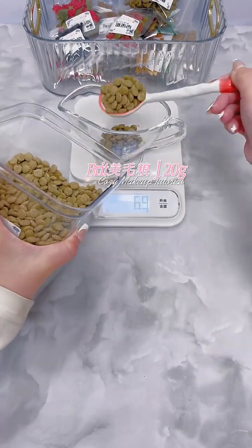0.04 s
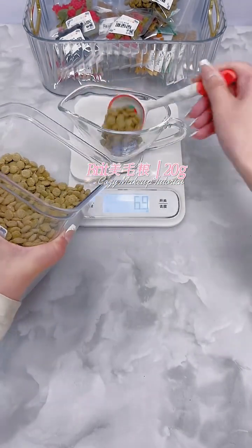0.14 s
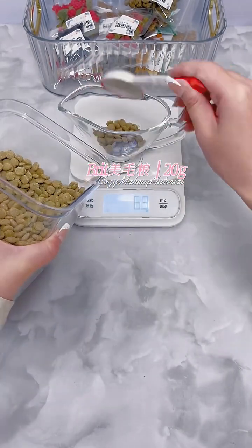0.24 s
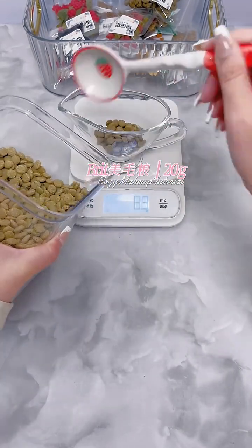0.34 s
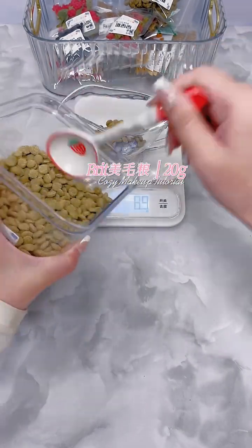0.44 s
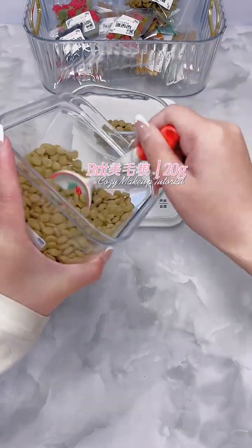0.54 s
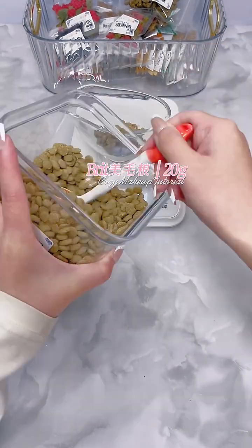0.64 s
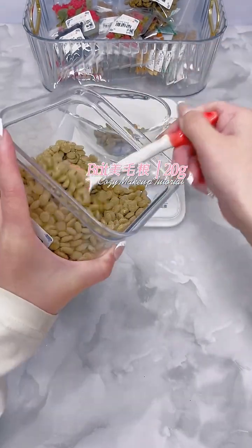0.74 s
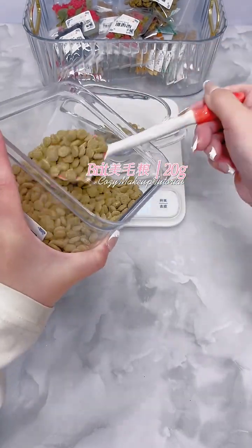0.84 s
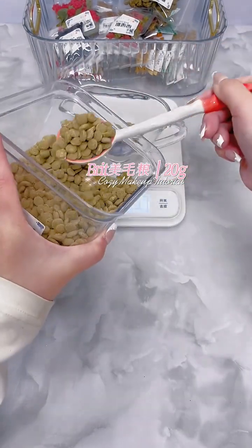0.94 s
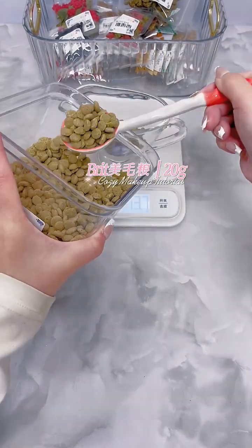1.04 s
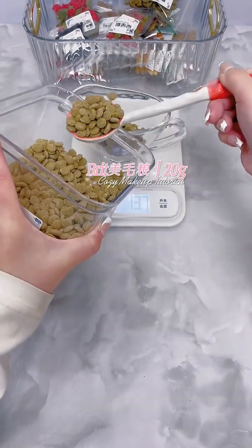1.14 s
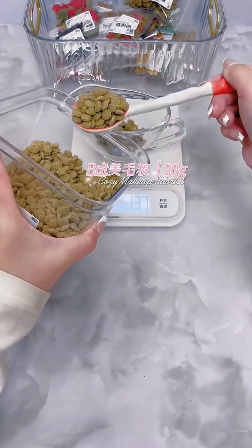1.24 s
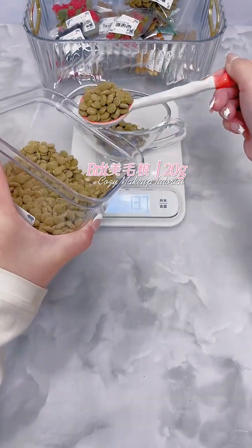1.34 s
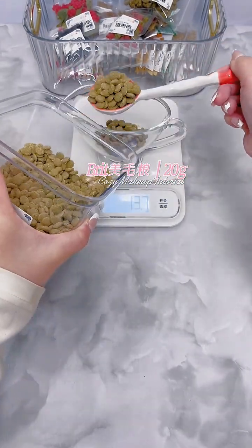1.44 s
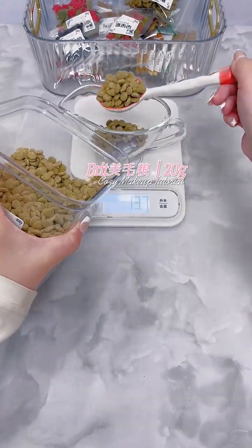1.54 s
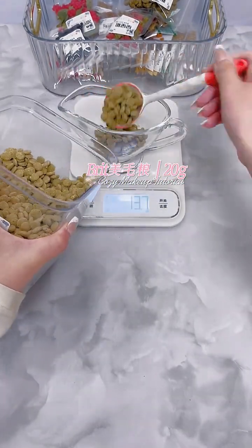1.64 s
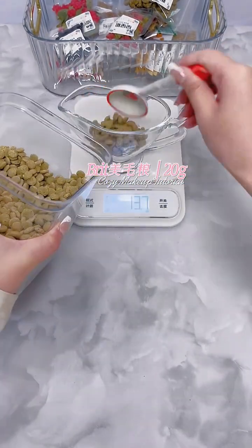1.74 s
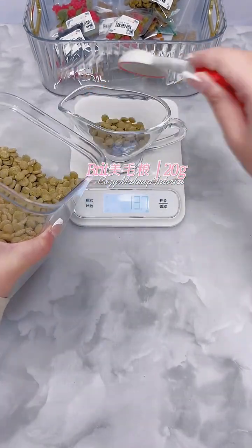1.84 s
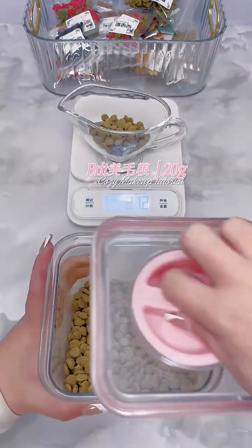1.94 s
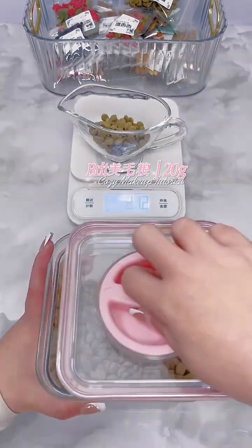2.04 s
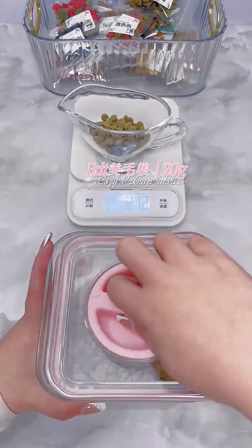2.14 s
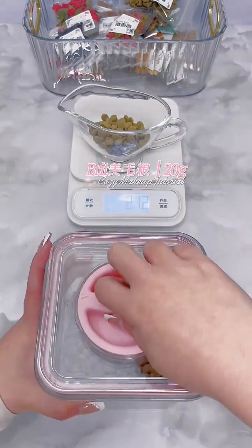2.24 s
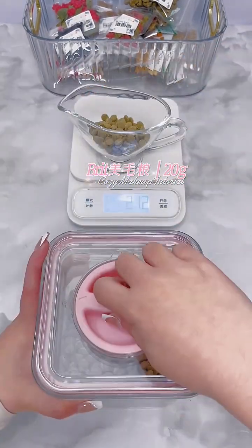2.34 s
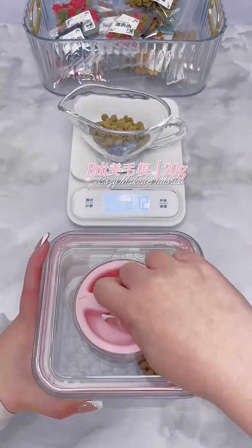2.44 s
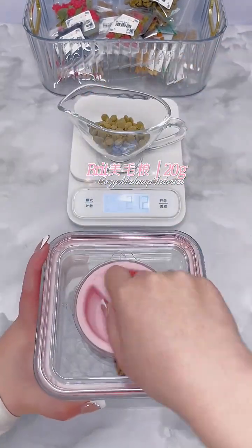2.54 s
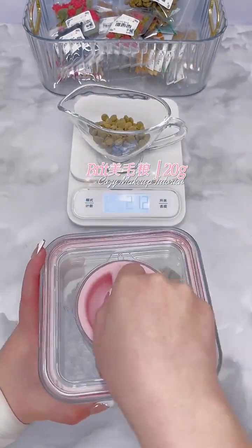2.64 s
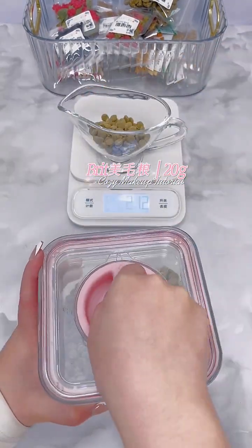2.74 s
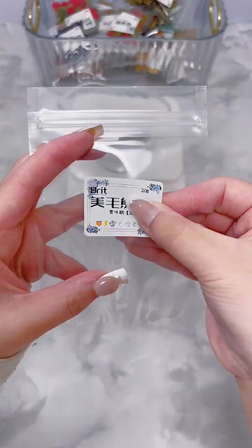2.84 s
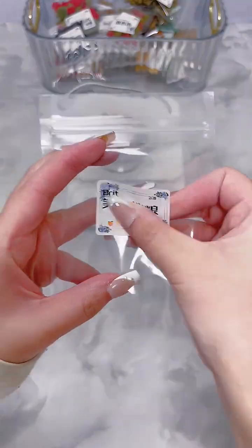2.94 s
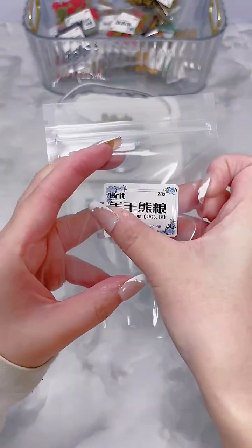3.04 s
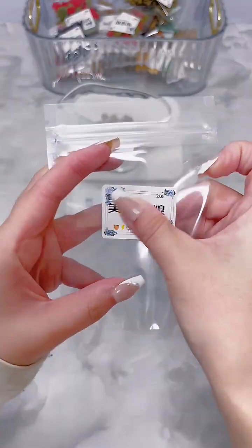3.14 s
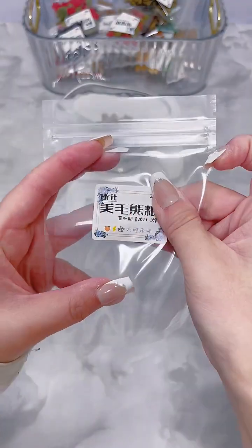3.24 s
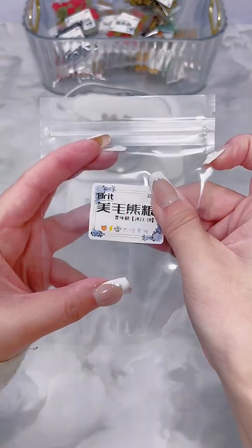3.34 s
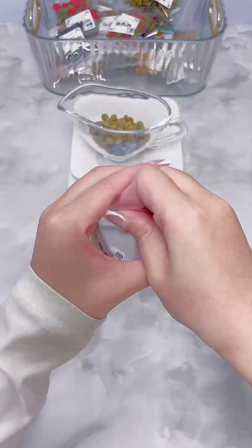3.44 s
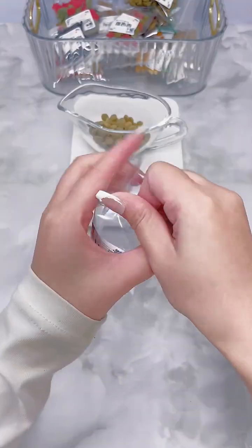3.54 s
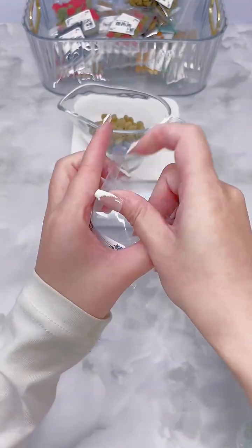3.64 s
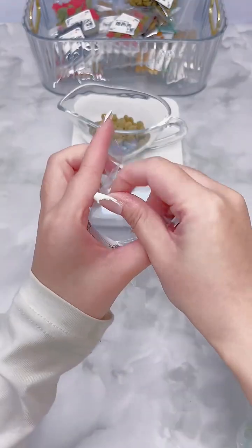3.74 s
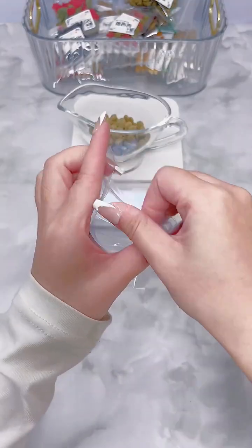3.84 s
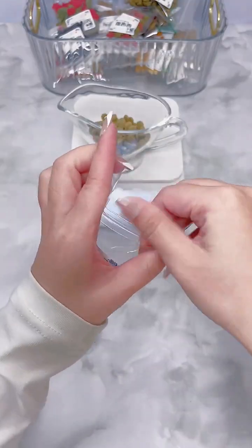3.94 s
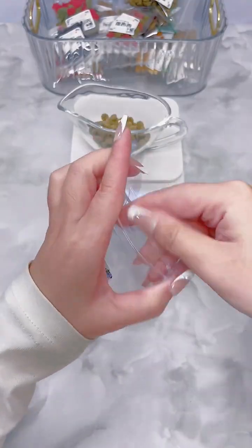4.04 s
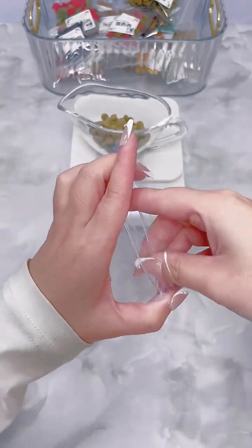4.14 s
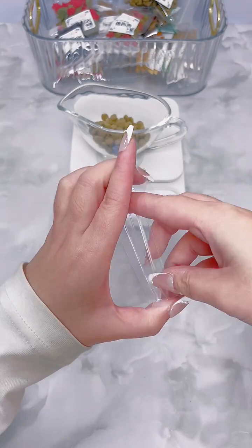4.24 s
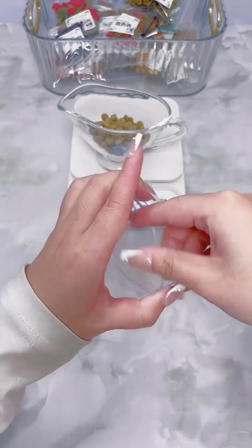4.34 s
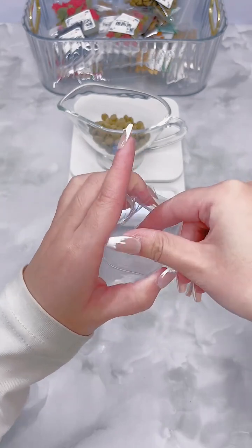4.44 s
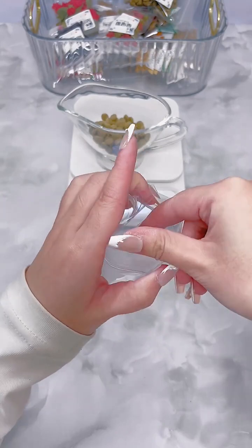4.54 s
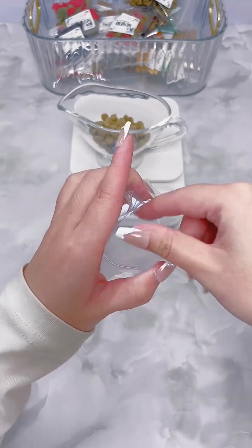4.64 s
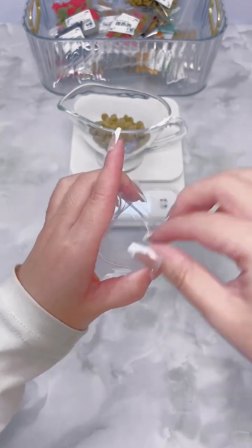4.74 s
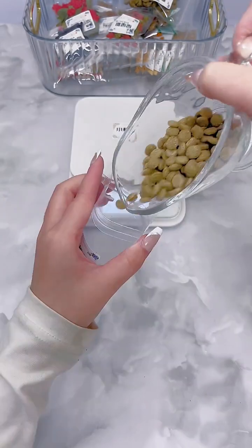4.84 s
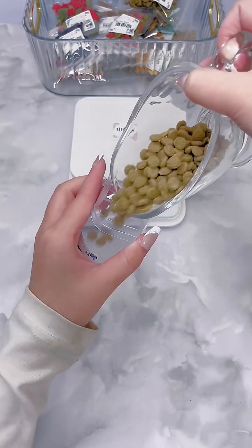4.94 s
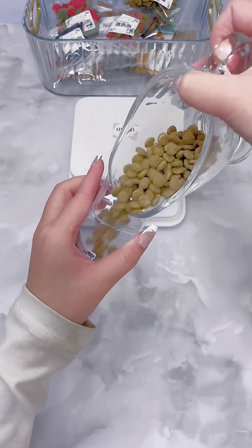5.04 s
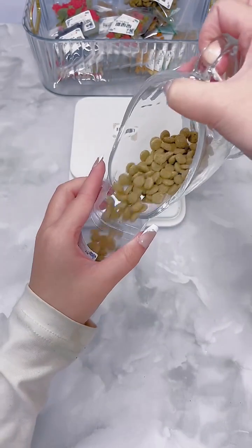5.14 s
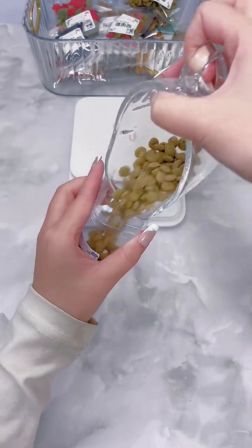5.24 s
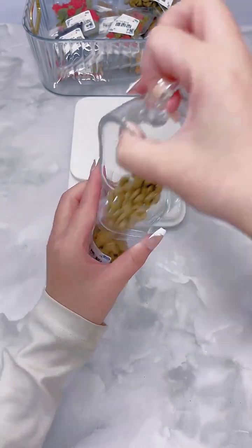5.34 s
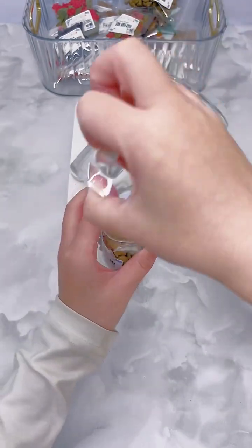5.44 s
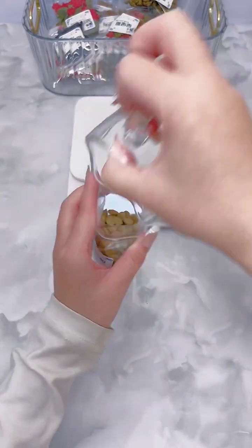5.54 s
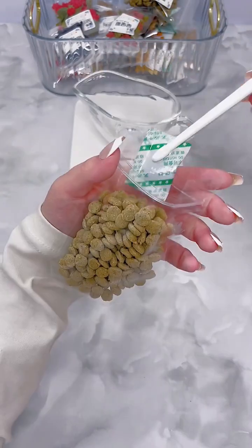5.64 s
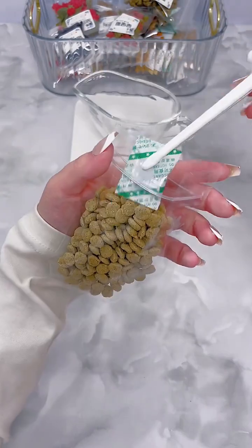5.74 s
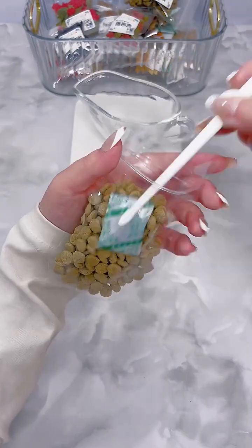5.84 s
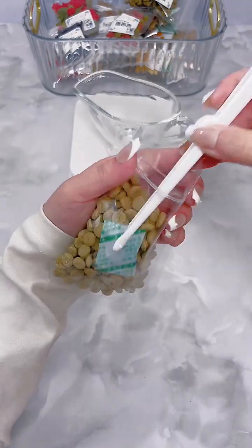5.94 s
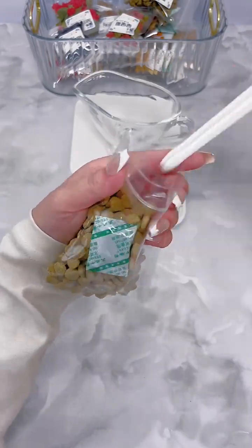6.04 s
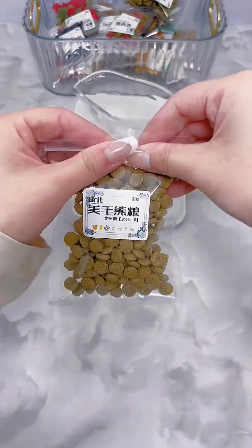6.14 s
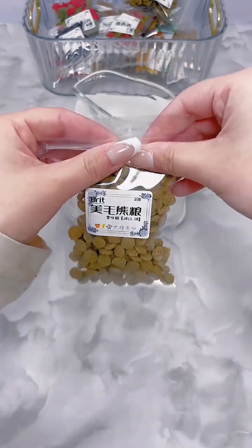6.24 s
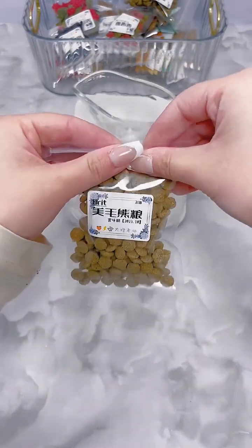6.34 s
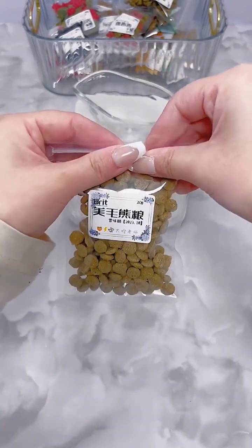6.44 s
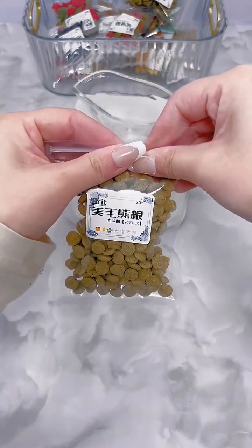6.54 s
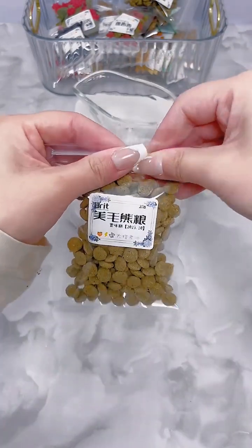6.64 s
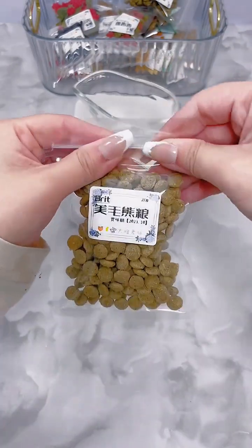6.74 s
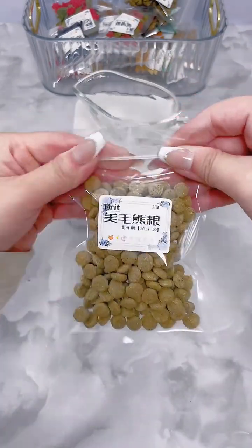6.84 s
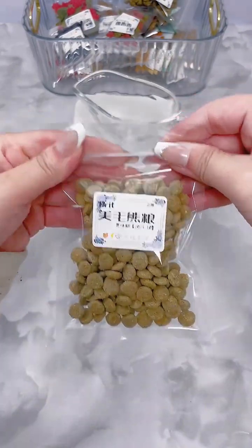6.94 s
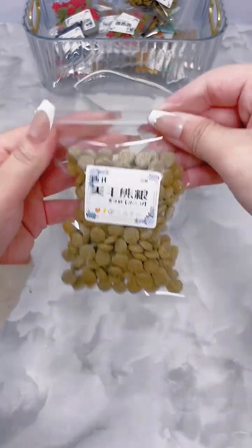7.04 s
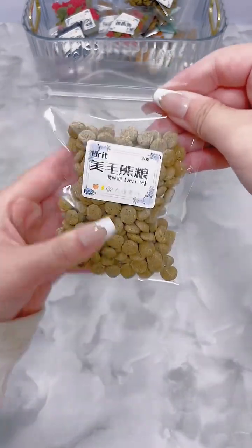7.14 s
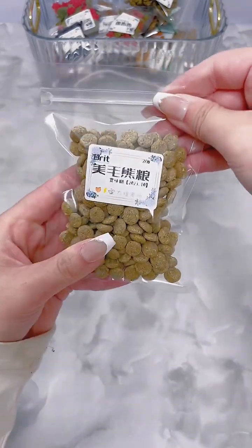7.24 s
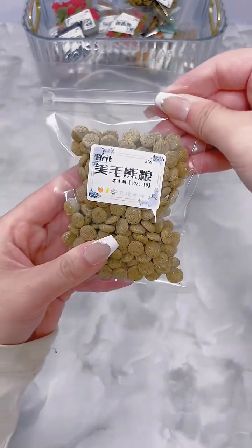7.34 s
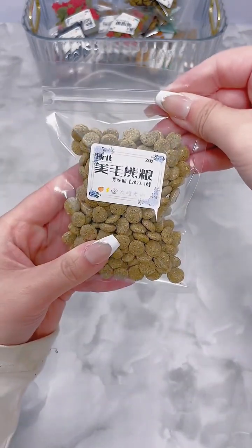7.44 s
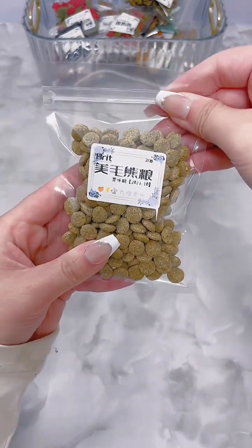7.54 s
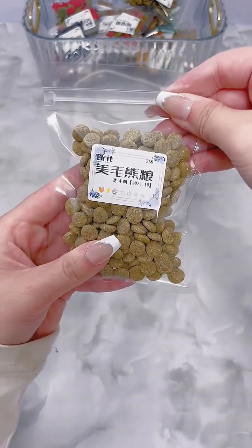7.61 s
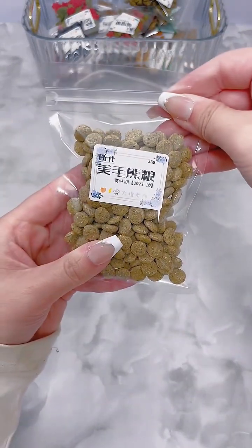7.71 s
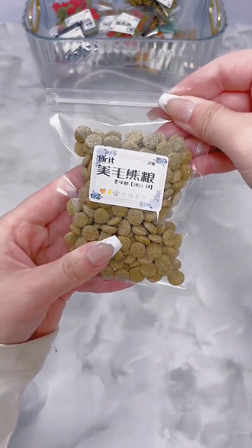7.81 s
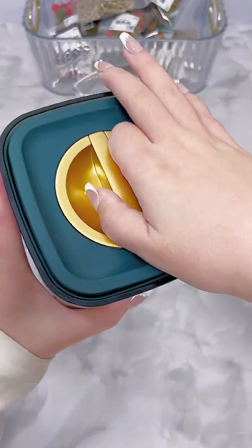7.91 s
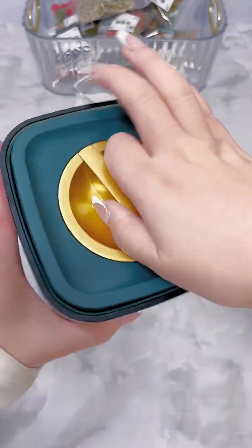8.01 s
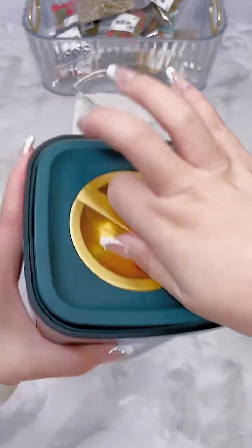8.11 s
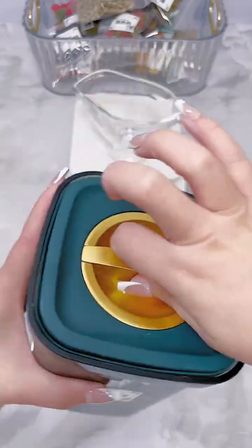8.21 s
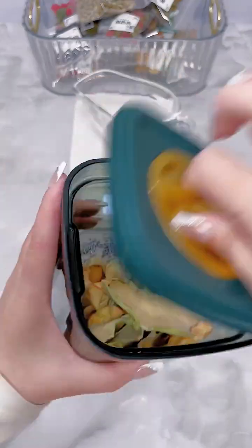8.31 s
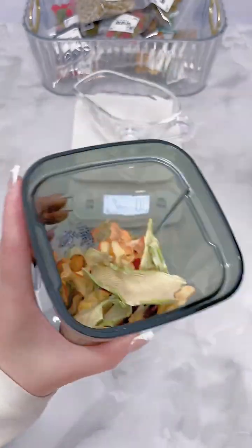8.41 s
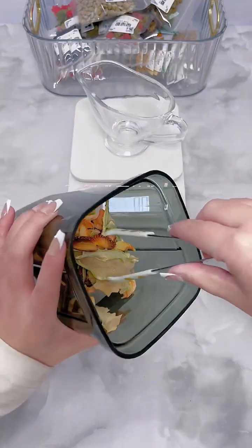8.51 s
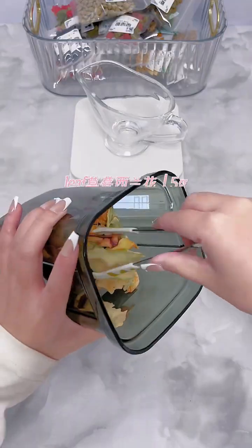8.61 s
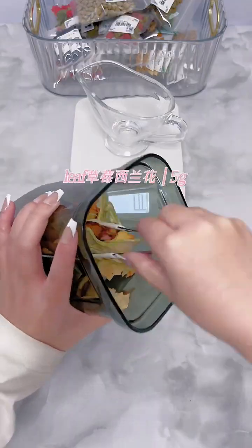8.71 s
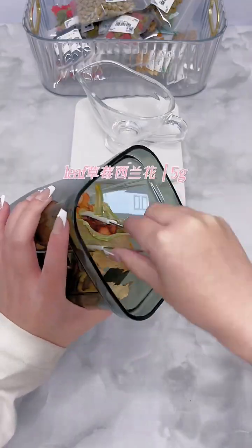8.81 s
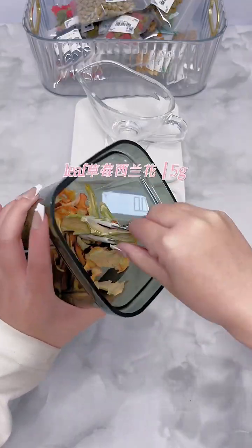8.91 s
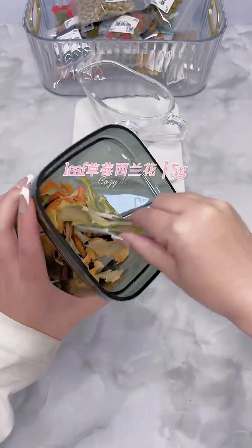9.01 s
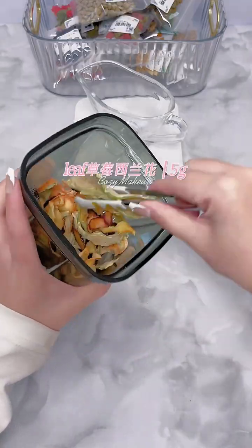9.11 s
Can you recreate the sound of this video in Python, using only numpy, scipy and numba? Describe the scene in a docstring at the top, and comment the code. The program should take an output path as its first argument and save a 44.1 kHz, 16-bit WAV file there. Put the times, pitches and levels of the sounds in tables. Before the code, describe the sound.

Dry pellets are scooped and tipped into a ringing glass jug, a lid knocks shut, a stiff plastic bag crackles and fills, a tub is unlatched.

```python
"""A quiet room, hands close to a phone: dry pellets are scooped from a plastic box and tipped into a glass jug,
the lid is shut and turned, a stiff plastic bag is opened, filled and zipped, a tub is unlatched and tongs stir
dried leaves in it. Blows are noise bursts and rubbing is dense noise ticks, both coloured by vessel resonances;
the glass is decaying sines. Ventilation, shaped noise with two narrow hum lines, rumbles behind."""
import sys
import numpy as np
from scipy import signal
from scipy.fft import rfft, irfft
from scipy.io import wavfile
from scipy.ndimage import uniform_filter1d
from numba import njit

SR = 44100
rng = np.random.default_rng(int(sys.argv[2]) if len(sys.argv) > 2 else 0)


def master_out(mix):
    """Clip the mix to full scale and print it as 16-bit PCM to the path in sys.argv[1]."""
    frames = np.transpose(np.atleast_2d(mix))
    ceiling = np.clip(frames, -1, 1)
    pcm = np.round(ceiling * 32767).astype(np.int16)
    wavfile.write(sys.argv[1], SR, pcm)


def nominal_scale(level):
    """Amplitude ratio for a level in decibels (scalar or array-like)."""
    x = np.asarray(level, float) / 20
    return 10 ** x


N = 404397
T = np.arange(N) / SR

# knocks, snaps and cracks of each vessel: t/s where the swell begins to break, body level/dB,
# hollow level/dB and treble level/dB against the body, fade time constant/ms
BOX_KNOCKS = [(0.4675, -6, -8, -4.5, 3.5), (0.5388, -30, 17, 3, 4.2), (0.573, -25, 8, -8, 5),
              (0.618, -16.5, -3, -12, 6.1), (0.653, -34, 7, -9, 4.9), (0.9486, -13, -9, -30, 1.8),
              (0.9932, -35.5, -17, 7, 3), (1.222, -40, 5.5, 9, 4.4), (1.273, -39, 4, 13, 4.5),
              (2.0205, -35, -11, -3, 3.5), (2.137, -22, 12, -9.5, 2.7), (2.143, -18.5, 3, -29, 6.9),
              (2.165, -12, 2.5, -11, 2.8), (2.173, -19, 6.5, -8, 2.66), (2.244, -30, 6, -19, 1.3),
              (2.2519, -19.5, 9.5, -4, 3.2), (2.285, -25.5, 11, -14, 2.3), (2.358, -36.5, -15, -13, 1.5),
              (2.396, -40, -6, -15, 1.8), (2.533, -26, -8, -11, 3.4), (2.6845, -31.5, -7, -7, 1.8),
              (2.713, -45, 9, -9, 2.3), (2.874, -42, 3, -6, 1.2)]
BAG_CRACKS = [(2.9464, -17.5, 1.5, 16, 2.65), (2.9504, -10, -8.5, -4, 2.46), (2.9914, -14.5, -8.5, 0, 1.9),
              (3.0039, -16.5, -14, 7, 3.8), (3.1695, -12, -16.5, -9, 1.7), (3.1921, -22, -8.5, -2, 2.4),
              (3.2213, -18.5, -13, -2, 2.4), (3.287, -14.5, -6.5, -1.5, 2.8), (3.3545, -14.5, -33, 5.5, 2),
              (3.4109, -13.5, -9.5, -1, 3.8), (3.479, -19.5, 0.5, -14, 2.5), (3.4976, -12, -33, 1.5, 2.6),
              (3.5235, -27, -22, -2, 2.4), (3.5405, -20.5, -13, -9, 4.9), (3.6093, -14, -18, -4, 1.8),
              (3.6523, -21, -0.5, -9, 3.7), (3.6698, -24.5, -21, -11, 5.5), (3.716, -17.5, -21, -7, 2.4),
              (3.7466, -21, -2.5, -9.5, 4.6), (3.792, -20, -9, 8, 2.4), (3.8301, -13, -8.5, 1, 1.85),
              (3.8418, -10.5, -13.5, 3, 1.9), (3.8457, -20, -15, -1, 2.7), (3.909, -26.5, -1, -8, 3.4),
              (3.931, -23, -12, -6, 2.8), (3.955, -22, -6, -9, 2.2), (3.9654, -26, -26, -10, 1.4),
              (4.0116, -19, -14, 7.5, 2.5), (4.0492, -22.5, -6, -2, 2.5), (4.0695, -24, -20, 0, 1.9),
              (4.1028, -13, -20, 2, 3), (4.1074, -16, -17, -2.5, 3.2), (4.1237, -15.5, -28, 0, 2.9),
              (4.1403, -13.5, -16, -5, 3.7), (4.2398, -17, -15, -17, 0.85), (4.3187, -22.5, -7, -10, 2.2),
              (4.3271, -13, -22, 2, 3.3), (4.3399, -12.5, -12, -5, 2.2), (4.353, -14, -39, -0.5, 2.2),
              (4.3938, -15.5, -25, 2.5, 4.2), (4.4325, -10, -12.5, -3.5, 2.04), (4.4685, -15, -18, -4, 2.2),
              (4.642, -28, 0.5, 2, 2.5), (4.6706, -26, -1.5, -1, 2.2), (4.783, -13.5, -10, -1.5, 2),
              (4.8953, -27.5, -7, 10, 3.2), (4.9188, -12, -10.5, -3, 3.5), (4.9411, -18, -11, -7, 2.2),
              (4.959, -22, 3, -8, 2.7), (5.015, -9.5, -26, -6, 1.2), (5.1111, -10, -22, -13, 2.1),
              (5.1267, -20, -5, -10, 2.8), (5.1834, -16.5, 1, -9, 3.1), (5.24, -17, -3, -7, 2.6),
              (5.2651, -15, -7, -10, 3.7), (5.3076, -19, -18, -3, 2.2), (5.3228, -12.5, -14, -12, 2.4),
              (5.3677, -17, -27, -5, 1.3), (5.5123, -39, 11, -13, 1), (5.5589, -10.5, -2, -2, 2.4),
              (5.5773, -12, -4.5, -13, 1.8), (5.7685, -28, -22, -7, 2.4), (5.8209, -17, -7, -4, 1.9),
              (5.8539, -24, -2, -11, 2.2), (5.8752, -7.5, -6.5, -14, 3), (5.8968, -8, -6, -7, 3.1),
              (5.9334, -21, 0, -13, 2.2), (5.9664, -17, -18, -5, 1.9), (6.0423, -11, -21, -23, 2.3),
              (6.0468, -16, -16, -3, 2.9), (6.1622, -25.5, -6, -17, 2.4), (6.1876, -26, -9, -3, 3),
              (6.2486, -19, -11, -2, 2), (6.357, -21, -17, -15, 2.3), (6.375, -25.5, -17, -20, 2.2),
              (6.3928, -33, -12, -18, 3), (6.4306, -31, -9, -4, 1.7), (6.4617, -8, -10.5, -2.5, 2.6),
              (6.4954, -18, -28, 6.5, 1.3), (6.639, -25, -26, 12.5, 2.6), (6.7526, -28, -21, -15, 5.9),
              (6.7965, -26.5, -12, -15, 3.8), (6.8058, -24, -22, -12, 2), (6.8766, -22.5, -14, -10, 3.5),
              (6.8922, -26, 0, -13, 2.9), (6.9074, -26.5, -14, -6, 2.6), (6.9526, -27.5, -16, -5, 3),
              (6.987, -26, -12, -10, 4), (7.0324, -18, -8.5, -3, 2.3), (7.1746, -13, -1.5, -10, 1.9),
              (7.2096, -25.5, -3, -16, 4.2), (7.228, -24.5, -25, -16, 2.9), (7.2933, -21, -5, -22, 4.3),
              (7.3153, -23, -11, -2, 2.4), (7.3486, -22, -4.5, -16, 3.2), (7.3677, -15.5, -14, -14, 3.8),
              (7.3824, -27, -24, -17, 2.5), (7.47, -28.5, -11, 1, 5.1), (7.5057, -25, -1.5, -27, 2.3),
              (7.5482, -33.5, -12, -17, 2.8), (7.5987, -26.5, -8, -35, 2.6), (7.644, -36, -22, -24, 2.2)]
TUB_KNOCKS = [(7.79, -22.5, -27, -34, 2), (7.813, -33, 1, -9, 3), (7.834, -30, -12, -3, 2.3),
              (7.842, -15.5, -11, -30, 3.23), (7.883, -15, -18, -5.5, 3.7), (7.937, -17, -12, -8.5, 2.2),
              (7.994, -11, 3.5, -6.5, 3.17), (8.08, -31, 10, -9, 5), (8.096, -9.5, -5.5, -11, 4.9),
              (8.107, -18.5, 7.5, -15, 2.3), (8.133, -9.5, -5, -7.5, 4.4), (8.275, -19, 1.5, -15, 2.9),
              (8.331, -41, 8, -17, 2.7), (8.37, -36, 2, -12, 5.9), (8.442, -45, -4, -15, 2.5),
              (8.48, -49, -4, -9, 1.5), (8.612, -24, -10, -18, 2.7), (8.64, -38, -9, 11, 4.2),
              (8.664, -21, 6, -16, 5.2), (8.739, -30.5, 15, -1.5, 3.8), (8.769, -10, -3, -9, 2.95),
              (8.839, -34, 6, -8, 2.5), (8.852, -26.5, 11, -16, 2.8), (8.864, -17, -25, -24, 5),
              (8.874, -26.5, 7.5, 4, 3.8), (8.896, -36, 18, -1.5, 6.3), (8.915, -23.5, 0, -14, 4.2),
              (8.992, -28, 9.5, -4, 3.85), (9.018, -21.5, -16, -7, 3.1), (9.05, -29.5, 7, -10, 3),
              (9.146, -31.5, -16, 1, 3.2)]
RISE_MS, RISES_TO_PEAK = 0.21, 1.4  # shortest swell; the peak comes this many swells after t
SPOT_PITCH = 0.04  # each blow lands on another spot and bends the resonances by this share
# the small patch of wall under each blow rings at its own pitch
PATCH_HZ, PATCH_OCTAVES, PATCH_WIDTH_HZ, PATCH_DB = 3800, 0.5, 600, 2


def knocks(start, end, vessel, tail_db, rise_share, strays):
    """Each blow swells, breaks and fades with a rattling tail; it rings the vessel."""
    events = [row for row in BOX_KNOCKS + BAG_CRACKS + TUB_KNOCKS if start <= row[0] < end] + strays
    s, body_db, hollow_db, treble_db, fade_ms = np.transpose(events)[:, :, None]
    rise_ms = RISE_MS + rise_share * fade_ms  # a softer blow both swells and fades more slowly
    lead = 768  # samples before the peak
    t = (np.arange(3 * lead) - lead) / SR
    rise = np.exp(np.minimum(t, 0) / (rise_ms / 1000))
    fade = np.exp(-np.maximum(t, 0) / (fade_ms / 1000))
    rattle = nominal_scale(tail_db) * (t > 0) * np.exp(-t / 0.004)
    burst = rise * (fade + rattle) * rng.standard_normal((len(s), len(t)))
    # the quicker the rise, the harder the snap at the moment of contact
    snapped = burst.copy()
    snapped[:, lead] += 6.5 / np.maximum(rise_ms[:, 0], 0.5)

    pitch = fill_pitch(s + 0 * t) * np.exp(SPOT_PITCH * rng.standard_normal(s.shape))
    patch_hz = PATCH_HZ * 2 ** (PATCH_OCTAVES * rng.standard_normal(s.shape))
    patch_hz = np.clip(patch_hz, 1800, 9000) + 0 * t
    patch = ring(snapped.ravel(), patch_hz.ravel(), 1. * PATCH_WIDTH_HZ).reshape(burst.shape)
    wall = snapped + nominal_scale(PATCH_DB) * patch
    blows = 0
    layers = vessel_parts(wall, snapped, (burst + snapped) / 2, pitch, vessel)
    for layer, relative_db in zip(layers, (0, hollow_db, treble_db)):
        # levels hold for the loudest 1.5 ms
        loudest = np.sqrt(uniform_filter1d(layer ** 2, size=66, axis=1).max(axis=1, keepdims=True))
        blows = blows + nominal_scale(body_db + relative_db) * layer / loudest

    out = np.zeros(N + 2 * len(t))
    peaks = (s + RISES_TO_PEAK * rise_ms / 1000)[:, 0]
    for at, blow in zip(peaks, blows):
        out[int(at * SR):][:len(t)] += blow
    return out[lead:N + lead]


# stray pieces knocking about during a stroke
LOOSE_PER_S, LOOSE_SCATTER_DB, LOOSE_FADE_MS = 70, 3, 3.5


def loose_knocks(start, end, treble_db, db):
    """Stray knocks as rows for knocks(): they follow the stroke of the moment, each with its own colour."""
    s = rng.uniform(start, min(end, N / SR), int(LOOSE_PER_S * (end - start)))
    scatter = LOOSE_SCATTER_DB * rng.standard_normal((len(s), 3)).T
    body, hollow, treble = db + scatter + effort(s, start, end, treble_db)
    return list(zip(s, body, hollow - body, treble - body, LOOSE_FADE_MS + 0 * s))


def rustle(start, end, vessel, rate, scatter_db, treble_db):
    """Pieces tick against each other and the wall at unrelated moments; the heap shifts, so the pitch wanders."""
    s = np.arange(start, end, 0.002)
    layer_dbs = effort(s, start, end, treble_db)
    on = (T >= start) & (T < end)
    ticks = [grains(on.sum(), rate, scatter_db) for _ in range(3)]
    steps = np.arange(start, end + 0.1, 0.03)
    wander = np.interp(T[on], steps, rng.standard_normal(len(steps)))
    pitch = fill_pitch(T[on]) * (1 + 0.06 * wander)
    out = np.zeros(N)
    for layer, db in zip(vessel_parts(*ticks, pitch, vessel), layer_dbs):
        out[on] += level(layer, 0) * nominal_scale(np.interp(T[on], s, db))
    return out


def grains(count, rate, scatter_db):
    """Dense small ticks, each a millisecond or so of noise, over a smoother hiss of sliding; rms 1."""
    sizes = nominal_scale(scatter_db * np.minimum(rng.exponential(size=count), 4))
    ticks = (rng.random(count) < rate / SR) * sizes
    envelope = signal.lfilter([1], [1, -np.exp(-1 / (0.0012 * SR))], ticks) + 1.2
    return level(envelope * rng.standard_normal(count), 0)


# hand strokes that stir, rub or crumple: t/s of the strongest moment, body level/dB,
# swell and fade/s per 20 dB, hollow level/dB against the body
STROKES = [(.171, -30.5, 0.056, 0.1, -11.5), (0.478, -27.5, 0.015, 0.19, 2), (.58, -32, 0.11, 0.07, 11.5),
           (.616, -24.5, 0.086, 0.083, 4), (.72, -36.5, 0.077, 0.54, 0.5), (.95, -47, 0.08, 0.4, 4.5),
           (1.22, -51, 0.015, 0.29, 6.5), (1.712, -31, 0.052, 0.097, -22), (1.8, -49.5, 0.068, 0.85, 2),
           (2.144, -31.5, 0.014, 0.02, 14.5), (2.261, -37.5, 0.07, 0.086, 11.5),
           (2.47, -40, .012, 0.38, -1), (2.55, -36, 0.11, 0.24, -9), (2.95, -31.5, 0.086, 0.17, -7.5),
           (3.0, -30, 0.028, 0.093, -21), (3.2, -30.5, 0.07, 0.088, -8.5),
           (3.297, -36.5, 0.036, 0.054, 0.1), (3.366, -35.5, 0.04, 0.32, -8),
           (3.505, -25.5, 0.014, 0.064, -31), (3.62, -31.5, 0.084, 0.075, -7.5),
           (3.727, -32.5, .021, 0.21, -8), (3.84, -32.5, 0.067, 0.11, -22), (3.963, -38, 0.2, 0.061, -10),
           (4.057, -27, 0.038, 0.053, -6.5), (4.117, -32, 0.055, 0.19, -5), (4.243, -25, 0.014, 0.023, -29),
           (4.339, -31, 0.036, 0.11, -12), (4.43, -38, 0.081, .1, -8), (4.473, -32.5, 0.11, 0.071, -12),
           (4.663, -31.5, 0.062, 0.038, -6), (4.8, -42.5, 0.026, 0.37, -25), (4.908, -33.5, 0.11, .21, -31),
           (5.0, -29, 0.11, .15, 1.5), (5.07, -22.5, 0.13, 0.2, 3.1), (5.2, -25, 0.14, 0.18, 4),
           (5.3, -27, 0.17, 0.13, 3), (5.385, -21.5, .1, 0.11, 2.5), (5.48, -39, .1, 0.23, 6),
           (5.583, -36, 0.087, 0.098, -2), (5.64, -46, 0.12, 0.81, -7), (5.86, -15, 0.068, 0.09, -4),
           (5.981, -24.5, 0.049, .1, -3), (6.2, -40.5, 0.16, 0.26, -13), (6.37, -41, 0.19, 0.19, -2),
           (6.473, -24, 0.015, 0.042, -31), (6.5, -38, .03, 0.17, -42), (6.65, -45, 0.027, 0.37, -39),
           (6.835, -33.5, 0.14, 0.23, -5.5), (7.036, -30.5, 0.068, 0.034, -11),
           (7.14, -37.5, 0.023, .15, -10), (7.19, -31, 0.071, 0.22, -6), (7.37, -43, 0.15, 0.059, -1),
           (7.846, -20, 0.034, 0.031, -17), (7.942, -34, 0.012, 0.025, -2), (7.995, -30, 0.011, 0.04, 6.5),
           (8.103, -27.5, 0.068, 0.16, -9), (8.278, -37.5, 0.11, 0.083, 2.5), (8.35, -53, 0.087, 0.23, -6),
           (8.629, -26.5, 0.014, 0.19, -11), (8.671, -27.5, 0.036, 0.053, 7.5),
           (8.783, -26.5, 0.075, 0.089, 5.5), (8.879, -28.5, 0.042, 0.13, 0.5), (9.013, -38, 0.18, 0.17, 3)]
# the hands barely moving: body, hollow and treble level/dB
REST_DB = (-59, -54.5, -63)
TREBLE_PER_HOLLOW = -0.42  # a hollower stroke is a duller one


def effort(t, start, end, treble_db):
    """Levels of body, hollow and treble: the strokes of one action, summed in power over the rest level."""
    rows = [row for row in STROKES if start <= row[0] < end]
    s, db, swell, fade, hollow_db = np.transpose(rows)[:, :, None]
    body_db = db - 20 * np.where(t < s, (s - t) / swell, (t - s) / fade)
    relative_dbs = (0, hollow_db, treble_db + TREBLE_PER_HOLLOW * hollow_db)
    levels = []
    for relative_db, rest_db in zip(relative_dbs, REST_DB):
        power = np.sum(nominal_scale(2 * (body_db + relative_db)), axis=0) + nominal_scale(2 * rest_db)
        levels.append(10 * np.log10(power))
    return levels


# the air space shrinks as pellets fill the bag, and its hollow rises: t/s, pitch factor (end values hold)
FILL = [(4.95, .95), (5.2, 1.02), (5.4, 1.15), (5.6, 1.35), (5.62, 1.0)]


def fill_pitch(t):
    """Pitch factor of the resonances: less air left in the bag rings higher."""
    return np.interp(t, *np.transpose(FILL))


# resonances of each vessel, open or shut, empty or full: f/Hz, width/Hz, relative level/dB
# (those above 1700 Hz play a further factor of 2 stronger)
BOX = [(337, 75, -4.5), (612, 34, 0.5), (843, 71, 1.5), (1350, 370, -3), (2340, 2000, 1)]
BOX_SHUT = [(157, 28, -0.5), (270, 40, -5), (416, 125, 0), (580, 54, 1), (870, 340, -1.5), (1320, 180, -19),
            (1780, 780, 10), (2880, 580, 0)]
BAG = [(447, 2600, -50), (990, 2260, 36), (3660, 230, -60.5)]
BAG_FULL = [(432, 730, 1.5), (662, 38, 10.5), (1144, 630, 12), (2095, 1480, 3.5), (2710, 180, -11.5)]
TUB = [(572, 62, -2.5), (817, 37, 6), (1605, 170, -3), (1830, 830, 3), (2840, 1300, -8.5)]
TUB_SHUT = [(380, 230, -1.5), (820, 170, 4.5), (1246, 220, 2), (2180, 830, 7), (2970, 610, -30)]


def vessel_parts(x, x_low, x_high, pitch, vessel):
    """Body, hollow and treble: the walls colour the body above 1.7 kHz, the air inside rings below."""
    hollow, body = 0, band(x, 2190, 9020)
    for k, (hz, width, db) in enumerate(vessel):
        wall = hz > 1700
        source = x if wall else x_low
        mode = nominal_scale(db) * ring(source.ravel(), hz * pitch.ravel(), 1. * width).reshape(x.shape)
        if wall:
            body = body + 2 * mode
        else:
            hollow = hollow + (-1) ** k * mode  # alternating sign
    return body, band(hollow, 120, 2200), band(x_high, 7000, 17000)


@njit
def ring(x, hz, width):
    """State-variable resonance with a moving centre, gain 1 there."""
    y, b, l = np.empty(len(x)), 0., 0.  # output, band and low states
    for i in range(len(x)):
        g, k = np.tan(np.pi * hz[i] / SR), width / hz[i]
        v = (b + g * (x[i] - l)) / (1 + g * (g + k))
        b, l, y[i] = 2 * v - b, l + 2 * g * v, k * v
    return y


def band(x, lo_hz, hi_hz):
    """Band-pass along the last axis."""
    return signal.sosfilt(signal.butter(2, [lo_hz, hi_hz], "bandpass", fs=SR, output="sos"), x)


def level(x, db):
    """Scale to an rms level."""
    return x * nominal_scale(db) / np.sqrt(np.mean(x ** 2))


# modes of the glass: f/Hz, relative level/dB, t60/s, family 0-3
GLASS_MODES = [(969, -14, .1, 0), (2444, 0, .45, 0), (2620, 0, .3, 1), (5462, -14, .4, 1), (5096, 0, .3, 2),
               (6815, 1, .2, 2), (9130, -4, .28, 2), (10020, -4, .3, 2), (10200, -7, .2, 2),
               (13262, 0, .22, 3)]
# pellets striking the glass, the spot sets which family rings: t/s, level/dB added to families 0, 1, 2, 3
PINGS = [(0.155, -24.5, -40, -32, -31), (0.173, -25, -25, -29.5, -28), (0.199, -35, -50, -38, -29),
         (0.237, -41, -54, -46, -37), (0.29, -47, -50, -60, -60), (0.345, -50, -39, -56, -61),
         (1.221, -24, -25, -25, -55), (1.273, -29, -35, -36, -33), (1.342, -37.5, -39, -51, -61),
         (1.703, -18.5, -23, -25.5, -28), (1.729, -20, -19.5, -32.5, -17), (1.762, -21.5, -33, -38, -22),
         (1.808, -29.5, -45, -45, -32), (1.864, -41, -42, -45.5, -39)]


def jug():
    """A landing pellet sets the glass modes ringing anew and damps, within some 10 ms, what rang before."""
    out = np.zeros(N)
    ends = [row[0] for row in PINGS[1:]] + [DIPS[0][0]]
    for (at, *family_db), end in zip(PINGS, ends):
        on = slice(int(at * SR), int((min(end, at + 0.4) + 0.08) * SR))
        t = T[on] - at
        damping = np.exp(-np.maximum(T[on] - end, 0) / 0.01)
        touch = np.minimum(t / 0.001, 1) * damping
        phases = 0.7 * rng.standard_normal(len(GLASS_MODES))
        for (hz, db, t60, family), phase in zip(GLASS_MODES, phases):
            decay = nominal_scale(db + family_db[family] - 60 * t / t60)
            out[on] += touch * decay * np.sin(2 * np.pi * hz * T[on] + phase)
    return out


def walls(x):
    """Short echo of a small furnished room: decaying band-limited noise."""
    t = np.arange(SR // 4) / SR
    decay = np.exp(-np.log(1000) * t / 0.22)  # t60 0.22 s
    echo = band(rng.standard_normal(len(t)), 340, 9600) * decay * (t > 0.003)
    echo = echo / np.sqrt(np.sum(echo ** 2))
    return x + nominal_scale(-17.0) * signal.fftconvolve(x, echo)[:N]


# spectrum of the rumble and hiss: f/Hz, relative level/dB per Hz
AIR_SPECTRUM = [(12, -24), (22, 2.5), (42, 3), (70, -7), (140, -13.5), (250, -24), (1060, -35.5),
                (2530, -39.5), (4180, -45.5), (14700, -48), (16000, -64)]
# hum lines: f/Hz, width/Hz, level/dB against the rumble
HUM = [(90.7, 2.7, -14), (130.25, 1.85, -9)]
# the level of the rumble over time: t/s, level/dB
AIR_LEVEL = [(0, -34), (1.95, -32), (2.0, -35), (2.8, -33), (3.2, -38), (4.3, -42), (4.85, -35), (6.6, -39),
             (6.95, -35), (8.0, -35), (8.2, -41), (8.5, -36), (9.17, -35)]


def ventilation():
    """Low rumble and faint hiss of shaped noise, with two wavering hum lines of narrow noise."""
    hz, db = np.transpose(AIR_SPECTRUM)
    f = np.maximum(np.arange(N // 2 + 1) * SR / N, 1)
    shape = nominal_scale(np.interp(np.log(f), np.log(hz), db))
    air = irfft(rfft(rng.standard_normal(N)) * shape, N)
    hum = 0
    for centre_hz, width, hum_db in HUM:
        line = ring(rng.standard_normal(N), np.full(N, 1. * centre_hz), 1. * width)
        hum = hum + level(line, hum_db)
    return (level(air, 0) + hum) * nominal_scale(np.interp(T, *np.transpose(AIR_LEVEL)))


# the level dips briefly: t/s, half length/ms, level/dB
DIPS = [(1.961, 5.0, -30), (6.14, 5.0, -20), (7.9, 4.0, -10)]


def dip(mix):
    """Brief drops of the whole level: each slopes down, holds and slopes back."""
    for at, half_ms, db in DIPS:
        depth = np.clip(2 - 2000 * np.abs(T - at) / half_ms, 0, 1)
        mix = mix * nominal_scale(db * depth)
    return mix


# what the hands work on: end t/s, vessel, ticks per s, scatter of tick size/dB, rattle level/dB after a blow,
# treble level/dB of the rubbing, rise of a blow as a share of its fade, stray knock level/dB against the stroke
SHOTS = [(1.96, BOX, 1300, -1, -27, -2, .25, 0), (2.88, BOX_SHUT, 820, 1.5, -12, -11, .3, 0),
         (4.93, BAG, 650, 4, -5, -10, .21, -2), (5.61, BAG_FULL, 700, 0, -42, -7, 0.29, 3.5),
         (7.76, BAG_FULL, 750, 3.5, -9, -12, .21, -3), (8.55, TUB_SHUT, 430, 5, -43, -13.5, .4, -6),
         (9.2, TUB, 580, 2.5, -16, -8, 0.39, 1.5)]


def scene():
    """The hands' work, one action after another, over the room."""
    blows, rubbing, start = 0, 0, 0
    for end, vessel, rate, scatter_db, tail_db, treble_db, rise_share, loose_db in SHOTS:
        strays = loose_knocks(start, end, treble_db, loose_db)
        blows = blows + knocks(start, end, vessel, tail_db, rise_share, strays)
        rubbing = rubbing + rustle(start, end, vessel, rate, scatter_db, treble_db)
        start = end
    mix = walls(blows) + rubbing + jug() + ventilation()
    return dip(mix)[None]


def roll_off(x):
    """The treble ends steeply here."""
    return signal.sosfilt(signal.butter(12, 16510, fs=SR, output="sos"), x)


def record(dry):
    """The phone cuts the top above 15.7 kHz and clips the hardest cracks."""
    cut = signal.sosfilt(signal.ellip(8, 0.2, 40, 15700, fs=SR, output="sos"), dry)
    clipped = np.clip(cut, -1, 1)
    return roll_off(clipped)


dry = scene()
out = record(dry)
master_out(out)
```